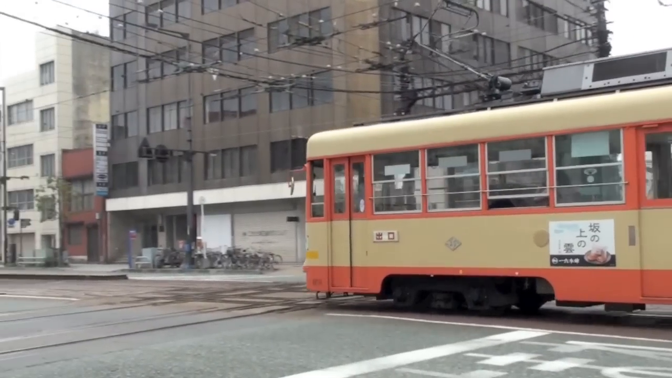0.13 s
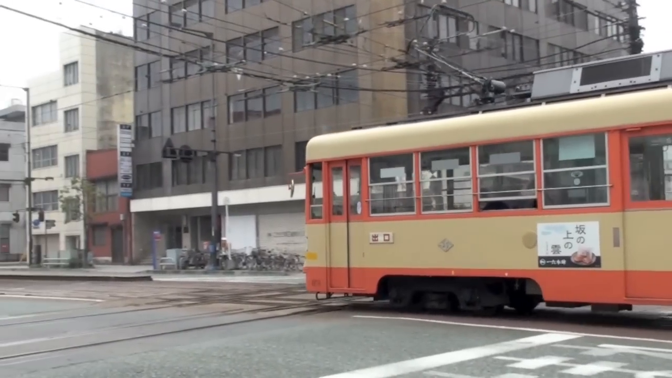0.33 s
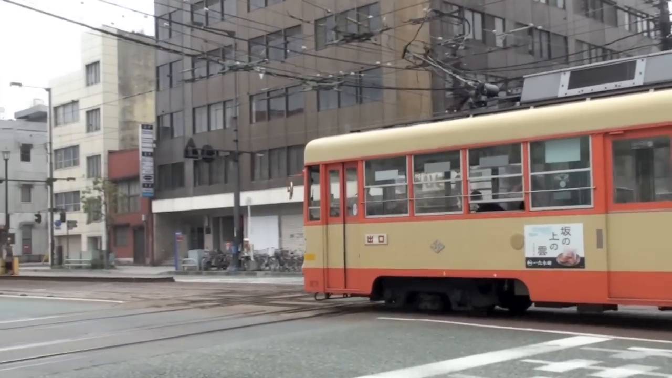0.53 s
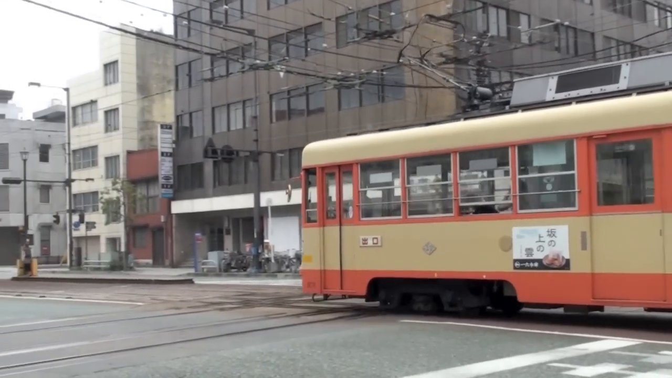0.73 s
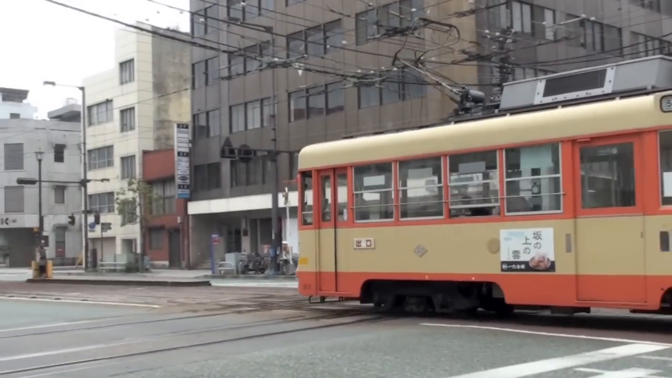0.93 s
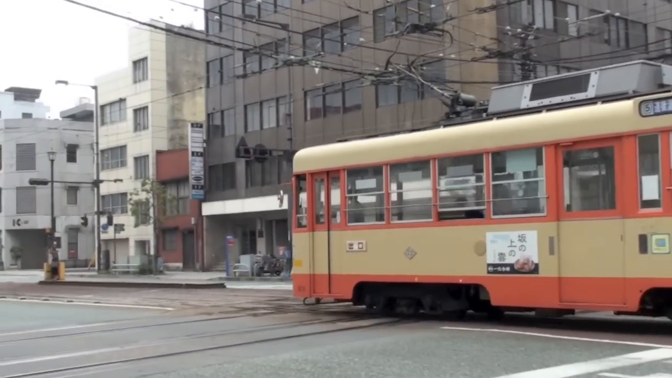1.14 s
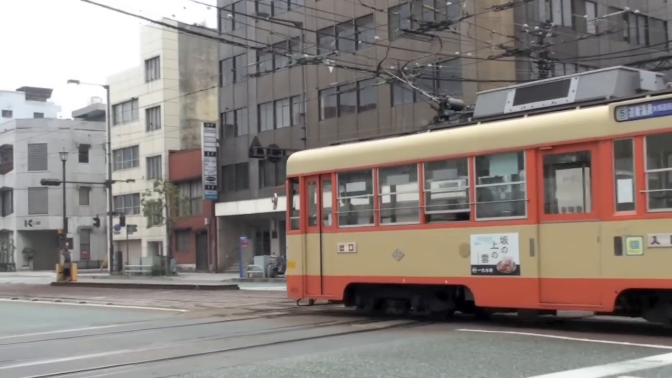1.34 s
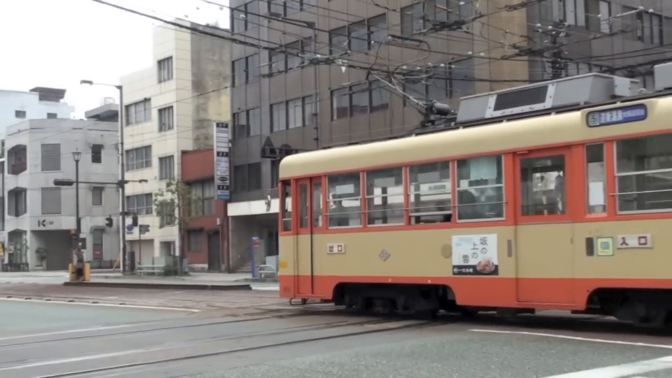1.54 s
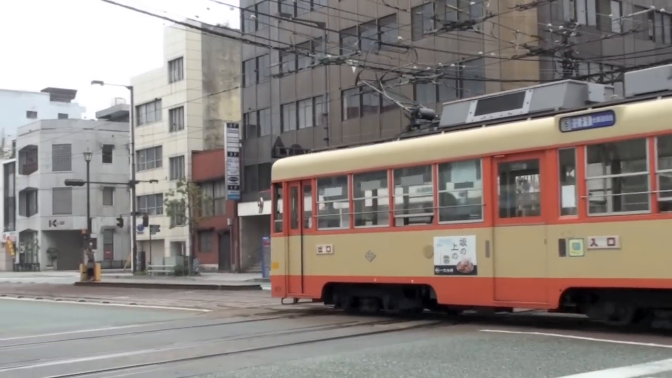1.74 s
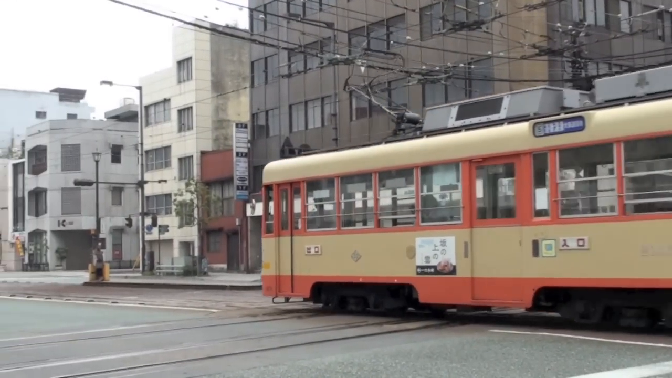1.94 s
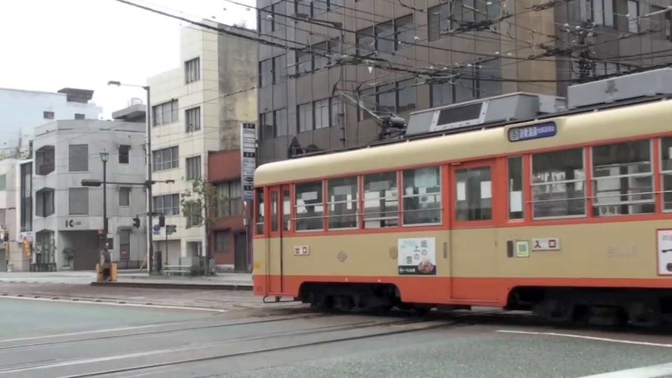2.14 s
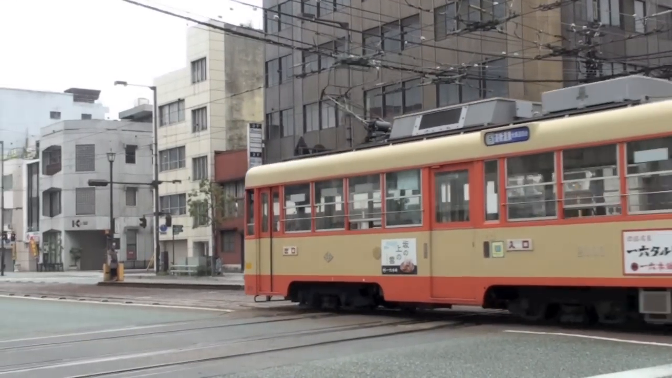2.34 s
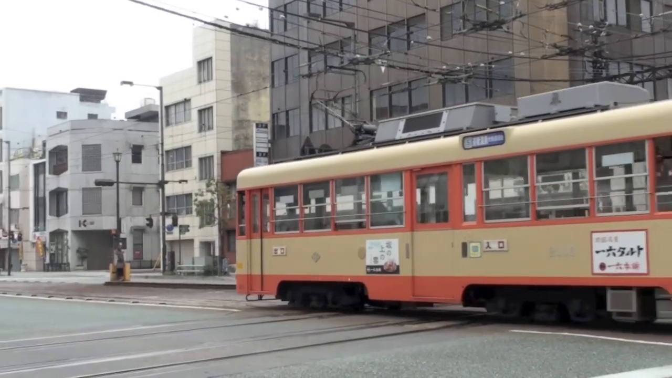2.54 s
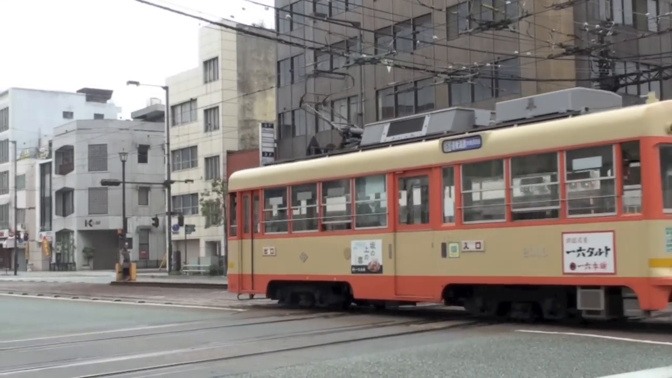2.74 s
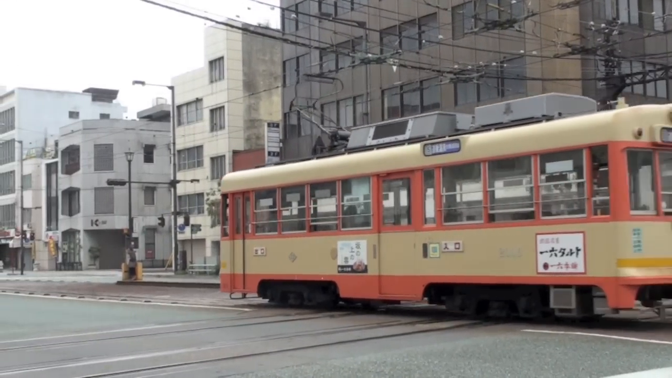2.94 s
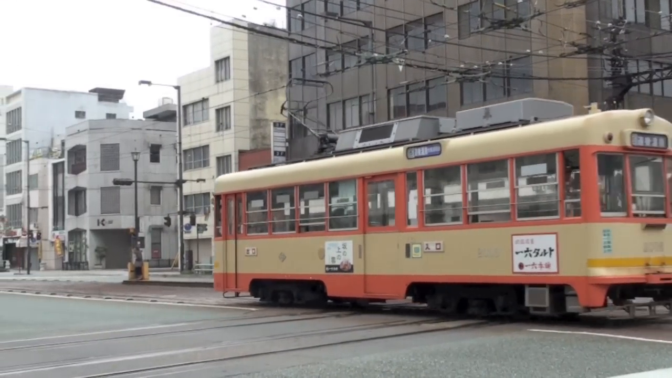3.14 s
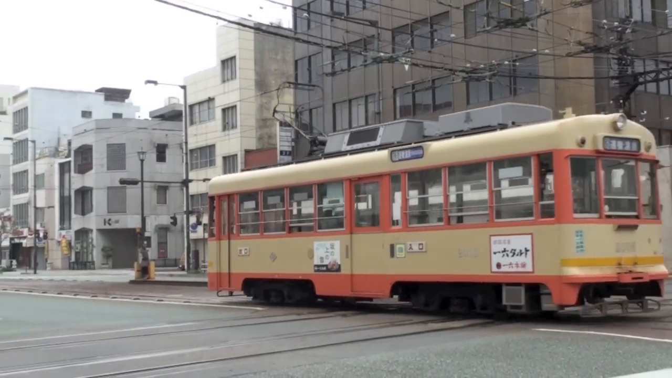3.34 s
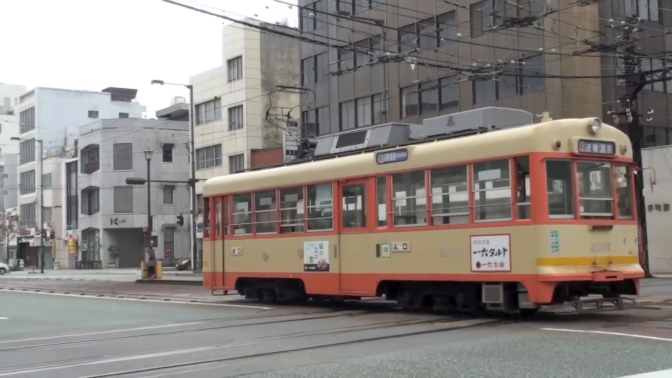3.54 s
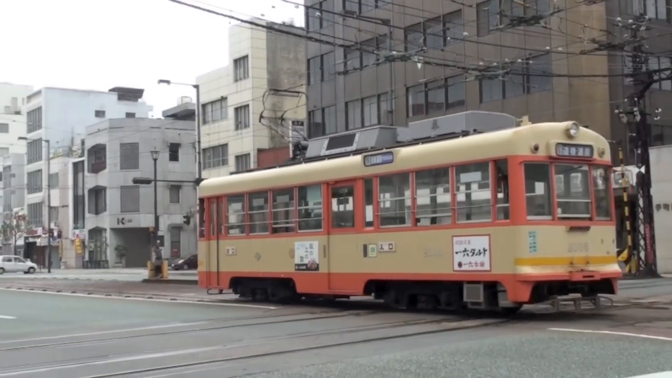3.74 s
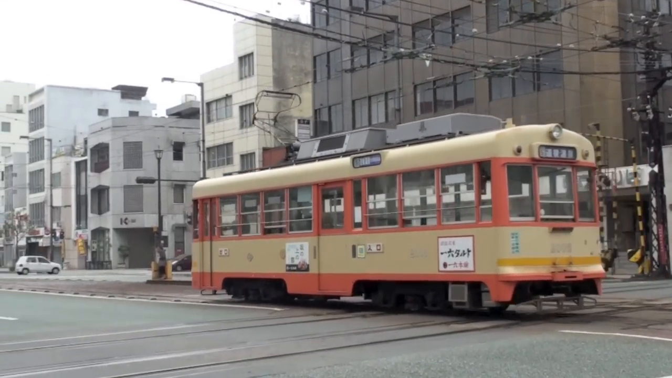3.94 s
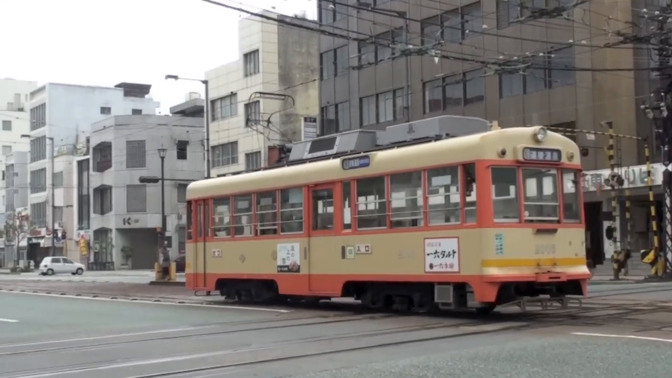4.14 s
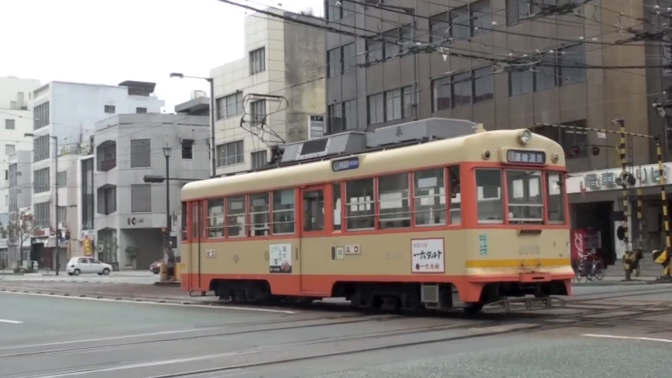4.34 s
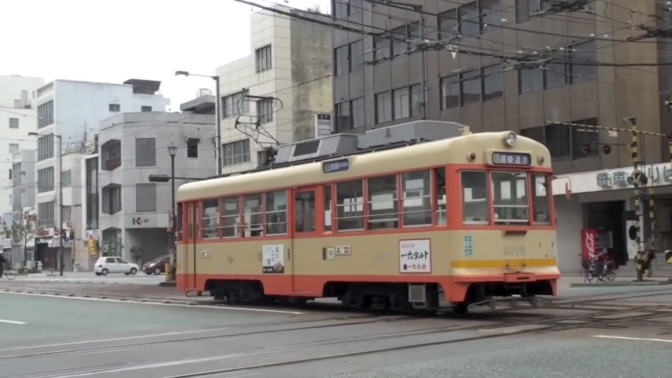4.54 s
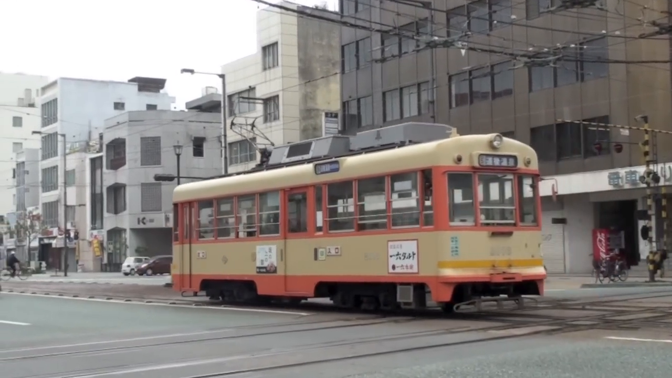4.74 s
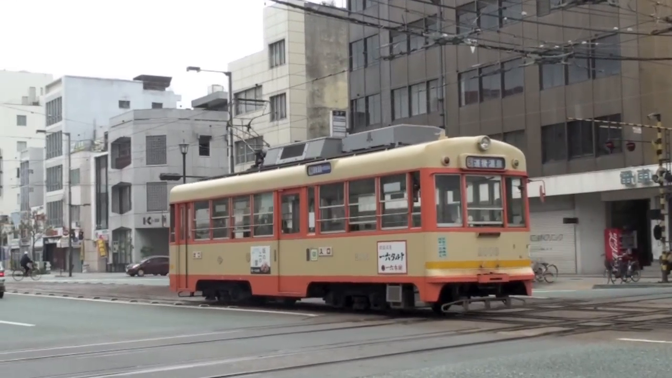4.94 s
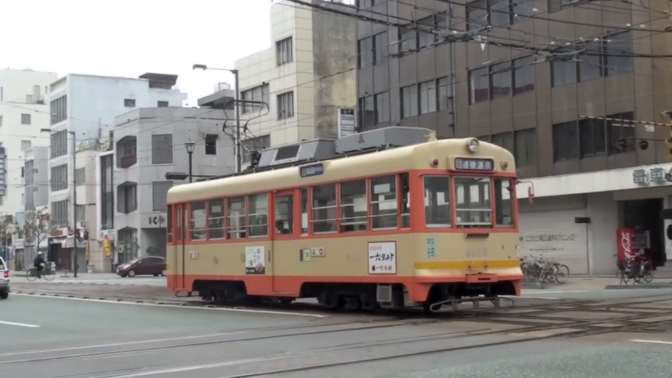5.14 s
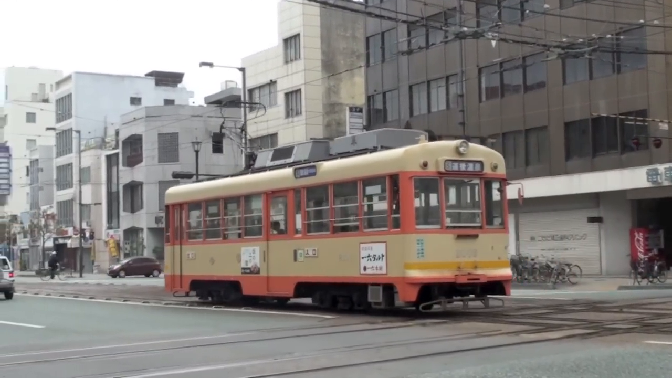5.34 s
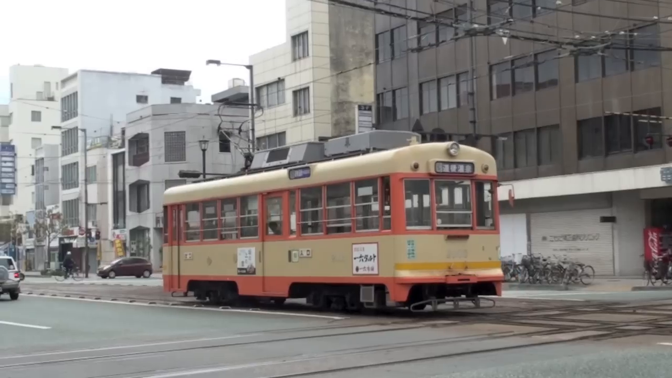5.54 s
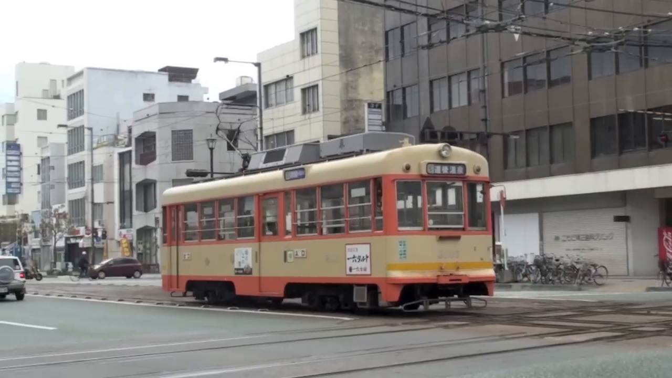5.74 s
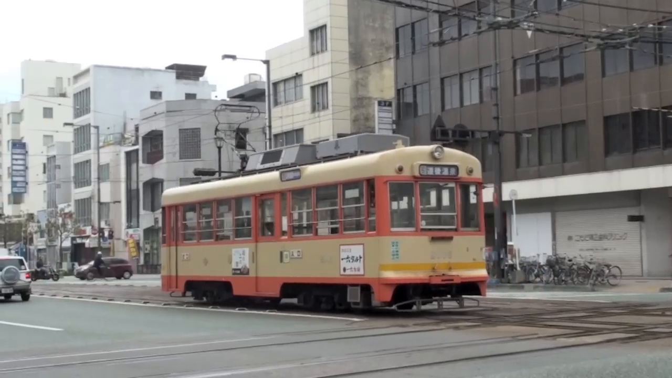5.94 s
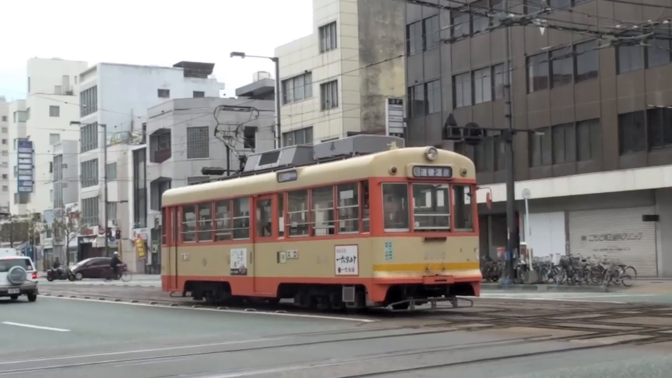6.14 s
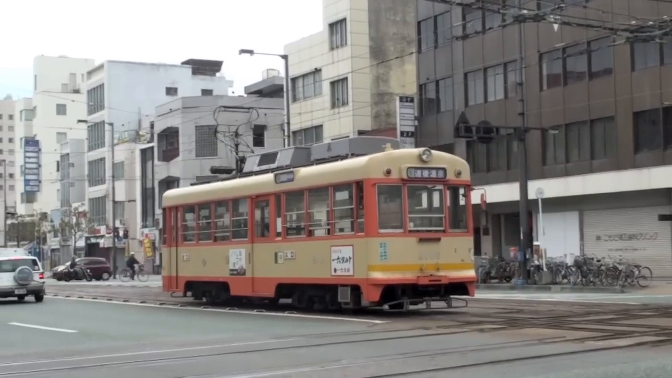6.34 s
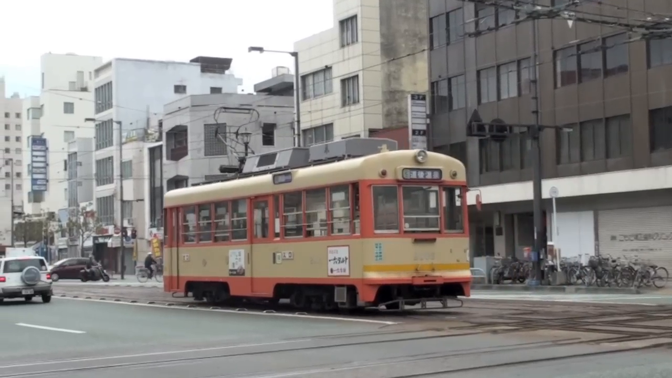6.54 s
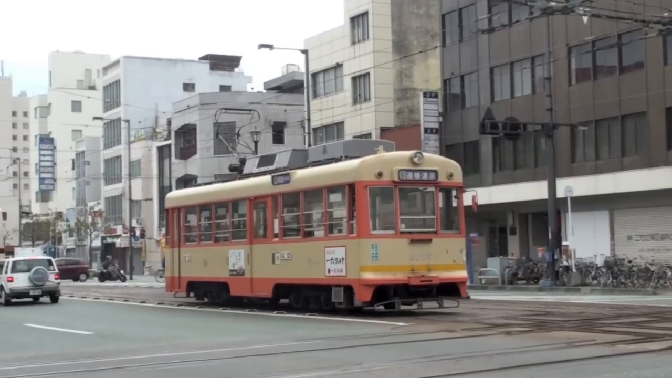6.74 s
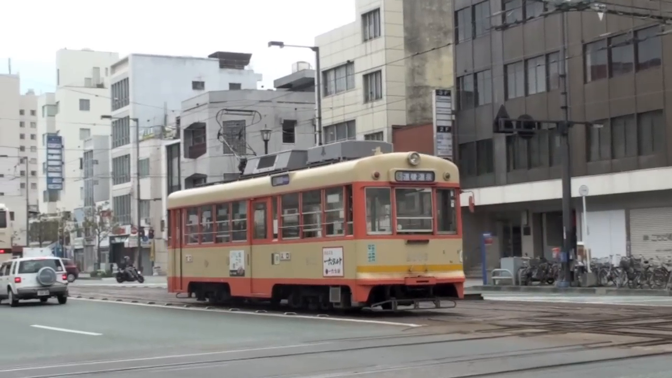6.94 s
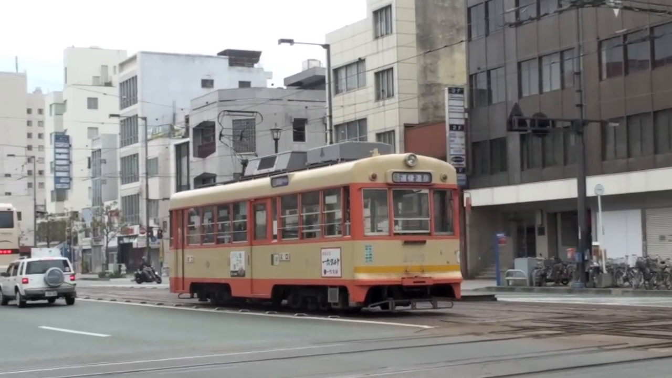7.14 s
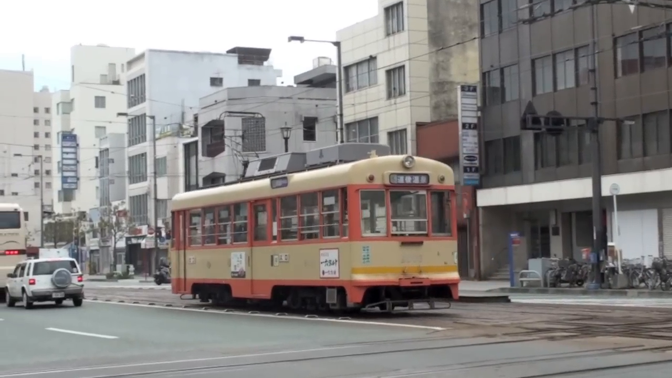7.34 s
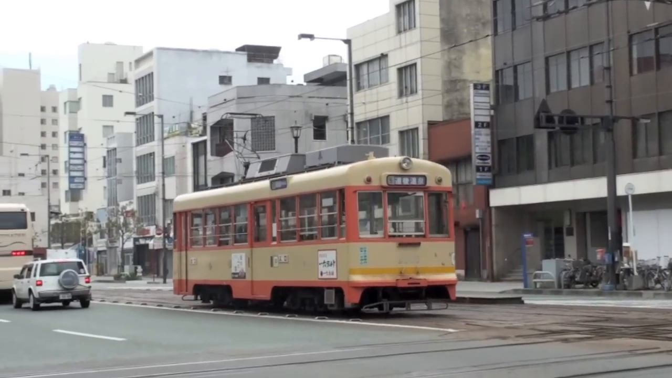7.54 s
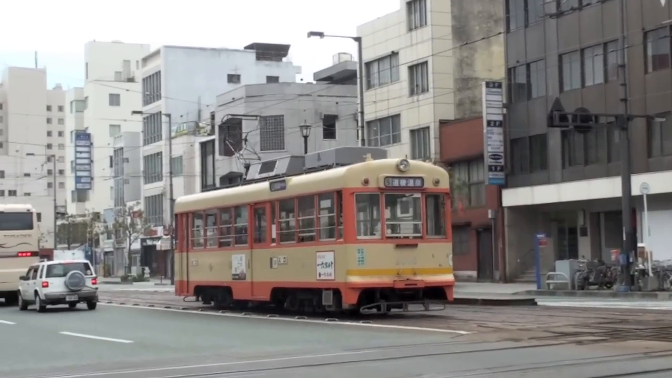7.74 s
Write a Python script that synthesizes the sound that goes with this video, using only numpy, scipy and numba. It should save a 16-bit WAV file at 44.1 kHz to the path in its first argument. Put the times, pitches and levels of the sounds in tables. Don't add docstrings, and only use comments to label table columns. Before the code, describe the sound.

Loud double metallic knocks and rattling as a tram crosses rail gaps in a city street, fading to traffic and a passing car.

```python
import sys
import numpy as np
from scipy import signal
from scipy.fft import rfft, irfft
from scipy.io import wavfile
from scipy.ndimage import uniform_filter1d
from numba import njit

SR = 44100
rng = np.random.default_rng(int(sys.argv[2]) if len(sys.argv) > 2 else 0)


def inscribe(sig):
    pcm = np.round(np.clip(np.atleast_2d(sig).T, -1, 1) * 32767)
    wavfile.write(sys.argv[1], SR, pcm.astype(np.int16))


def field_ratio(decibels):
    return 10 ** (np.asarray(decibels, dtype=float) / 20)


N = 347508
TIME = np.arange(N) / SR

# time in seconds, swell in dB, idling engine in dB.
TRAFFIC = [
    (0, 7.5, -18),
    (2, 4, -10),
    (5, -1.5, -1),
    (5.8, -0.8, -17),
    (6.9, -0.4, -6),
    (7.88, 0.2, -6),
]
# frequency in Hz, density in dB per Hz.
STREET_SPECTRUM = [(12, -36), (20, -2.5), (133, -3), (232, -2), (534, -6.5), (631, -6.5), (746, -6.5),
                   (932, -12.5), (1540, -15.5), (3000, -21), (3540, -33), (4070, -28), (8170, -40.5),
                   (15500, -48)]
# frequency in Hz, level in dB, decay t60 in seconds.
TYRE_WHINE = [
    (2280, -15, 0.017),
    (2930., -18.5, 0.025),
]
# frequency in Hz, side minus mid in dB.
STEREO_WIDTH = [(60, -12), (200, -17), (700, -13), (2400, -14), (8000, -11), (10500, -9), (11800, -17),
                (20000, -36)]
# start in seconds, peak in dB, t60 in seconds, first spark in dB.
SNAPS = [
    (0.1134, -27, 0.11, 3),
    (0.965, -22, 0.1, 1),
    (2.4219, -9.5, 0.15, 3),
    (2.4752, -14.5, 0.17, -3),
]
# frequency in Hz, density in dB per Hz.
SNAP_SPECTRUM = [(880, -41), (1500, -27), (3210, 1.5), (3990, -6), (6890, -4.5), (9060, -13),
                 (11700, -18.5), (13900, -35), (15500, -83)]
# start in seconds, build in seconds, peak in dB,
# loose steel in dB, ground in dB (both relative to the peak).
SHUDDERS = [(0.0, 0.17, -19.5, -19, -10), (0.552, 0.22, -22.5, -29, -2.5), (0.99, .14, -10.5, -11.5, -10.5),
            (1.43, 0.15, -10.5, -10.5, -19), (1.8, 0.032, -11.5, -14, -19), (2.12, 0.19, -17.5, -14.5, -10),
            (2.48, .19, -10.5, -10.5, -20), (2.89, 0.1, -8.5, -12, -21), (3.25, 0.15, -12, -11, -11.5),
            (3.7, 0.085, -18.5, -12, -21), (4.045, 0.11, -11.5, -15, -11.5), (4.4, .14, -13, -12, -18),
            (4.87, 0.12, -22, -10, -10), (5.28, 0.088, -33.5, -20, -15)]
# frequency in Hz, density in dB per Hz.
GROUND_SPECTRUM = [(12, -33), (20, -25), (49, -3), (102, -0.5), (156, -10.5), (200, -5), (260, -30.5),
                   (440, -120)]
# start in seconds, frequency in Hz, level in dB, t60 in seconds.
CLANKS = [(0.0, 491.4, -19.5, 0.91), (0.03, 293, -21, 1.2), (0.3, 567, -35, 1.8), (0.655, 3160, -24, 0.11),
          (0.66, 180, -20, .4), (0.72, 3250, -21, 0.07), (0.722, 2030, -27, 0.22), (0.743, 3250, -20, 0.12),
          (0.745, 1753, -24, .2), (0.995, 47, -14, .17), (1.36, 741, -19, 0.56), (1.53, 5050, -30, .08),
          (3.18, 750, -16, 1.6), (3.27, 5230, -27, 0.32), (3.27, 1725, -24, 0.57), (3.4, 4330, -30, 0.44),
          (3.72, 745, -12.5, 0.25), (3.797, 742, -19.5, 0.55), (3.812, 1725, -28.5, 0.71),
          (4.97, 6800, -53, .1), (5.064, 5400, -35, .1)]
# time in seconds, level in dB.
ROLLING = [(0.0, -27), (0.8, -29.5), (1.4, -28), (1.9, -37), (2.7, -29), (3.1, -29), (3.6, -31), (4.1, -39),
           (4.6, -28.5), (4.95, -36), (5.3, -44), (6.9, -42.5), (7.88, -43.5)]
# frequency in Hz, density in dB per Hz.
TREAD_SPECTRUM = [(290, -41), (500, 1.5), (748, -8), (815, -5), (1220, -34.5), (1770, -5.5), (2650, -13.5),
                  (2890, -6), (3580, -21), (3900, -16), (7340, -29), (8240, -23.5), (15500, -49)]
# frequency in Hz, level in dB.
WHEEL_HUM = [
    (738., -8.5),
    (1724., -20),
]
WHEEL_HZ = [739, 931, 1724, 2280, 2830, 2972, 3250, 3782, 4190, 4945, 5220, 5380, 5785, 6305, 6975, 7770,
            8200, 8480, 8730, 8990, 9940, 10430, 10930, 11420, 12120]
# level in dB, t60 in seconds.
WHEEL_MODES = [(-3, 0.77), (-12, 0.19), (-9, 0.57), (-11.5, 0.015), (-13.5, 0.14), (-11.5, .2),
               (-18, 0.076), (-14.5, 0.21), (-16, 0.14), (-18.5, 0.15), (-26, .12), (-17, 0.099),
               (-22, 0.19), (-30, 0.11), (-21, 0.11), (-24.5, 0.26), (-21.5, .12), (-26, 0.23), (-46, 0.26),
               (-47, .2), (-32, .15), (-32, .15), (-31.5, .15), (-29, .07), (-29, .06)]
# frequency in Hz, spread in Hz, level in dB.
PLATES = [(2990, 46, 5.5), (3740, 49, -4), (4150, 94, 1), (4840, 70, -14), (6900, 300, 3), (7770, 51, -8),
          (11400, 150, -8), (12100, 65, -11)]
# frequency in Hz, density in dB per Hz.
LOOSE_SPECTRUM = [(530, -29), (900, 0.5), (1470, -12.5), (1760, -4.5), (2380, -14), (2910, -17),
                  (3520, -18), (5200, -16), (6150, -23), (6720, -23), (11200, -34.5), (13000, -43),
                  (14200, -52)]
# frequency in Hz, density in dB per Hz.
BOGIE_SPECTRUM = [(71, -37.5), (120, -10), (166, -6.5), (203, -3.5), (263, -3.5), (418, 0), (600, -7),
                  (718, -2.5), (871, -14), (941, -13), (1160, -17.5), (1740, -21.5), (2600, -40),
                  (3380, -37), (5720, -120)]
AXLES = [(0.655, 0.733), (1.0195, 1.0966), (1.358, 1.4326), (1.8081, 1.8832), (2.1253, 2.203),
         (2.4723, 2.5499), (2.8993, 2.9788), (3.2524, 3.335), (3.7205, 3.7977), (4.0484, 4.1401),
         (4.4061, 4.4901), (4.5349, 4.6035), (4.8826, 4.9646), (5.2874, 5.3719)]
# first contact in dB, second contact in dB, bright share in dB,
# # rattle t60 in seconds.
BLOWS = [(-17, -13.5, -16, .26), (-5, -6.5, -27, .17), (-7.5, -6, -18.5, 0.33), (-3.5, -4.5, -15, 0.22),
         (-9, -8.5, -17.5, 0.19), (-2.5, -5, -39.5, 0.086), (-4.5, -7, -27, .3), (-4, -6.5, -25, 0.25),
         (-5, -4, -34.5, 0.13), (-4.5, -8, -24, 0.22), (-3, -3.5, -37, 0.37), (-4, -5, -22, .09),
         (-5.5, -5.5, -39, 0.18), (-25, -23.5, -21, 0.17)]
# start in seconds, peak in dB, bright share in dB.
BOUNCES = [(0.98, -11.5, -32), (1.15, -11.5, -12), (1.209, -7.5, -35), (1.469, -5, -20), (1.538, -12, -7),
           (1.598, -7.5, -14.5), (1.919, -6.5, -15.5), (2.308, -11, -26), (2.6, -7, -21),
           (2.661, -2.5, -19.5), (2.72, -10, -24), (3.04, -1.5, -23), (3.389, -24, -35), (3.443, -10, -8.5),
           (3.676, -12, -36), (3.74, -21, -31), (3.948, -24, -23), (4.1, -7, -39), (4.219, -6.5, -20),
           (4.438, -8, -33), (4.984, -21, -13), (5.019, -34, -26), (5.062, -14, -16), (5.432, -34.5, -39)]


def unit(x):
    return x / np.sqrt(np.mean(x ** 2))


def curves(table):
    s, *columns = np.transpose(table)
    return [np.interp(TIME, s, c) for c in columns]


def noise():
    return rng.standard_normal(N)


def colour(x, table):
    hz, db = np.transpose(table)
    log_hz = np.log(np.maximum(np.fft.rfftfreq(4096, 1 / SR), 1))
    cepstrum = irfft(np.interp(log_hz, np.log(hz), db) * np.log(10) / 20)
    cepstrum[1:2048] *= 2
    cepstrum[2049:] = 0
    h = irfft(np.exp(rfft(cepstrum)))
    return signal.oaconvolve(x, h / np.sqrt(np.sum(h ** 2)))[:N]


def walk(rate):
    hold = int(SR / rate)
    steps = np.repeat(rng.standard_normal(N // hold + 1), hold)
    return 1.3 * uniform_filter1d(uniform_filter1d(steps, hold), hold)[:N]


def knocks(per_s, spread_db):
    hits = rng.random(N) < per_s / SR
    return unit(hits * rng.standard_normal(N) * field_ratio(spread_db * rng.exponential(size=N)))


def pan(x, db):
    return x * field_ratio(np.array([db / 2, -db / 2]).reshape(2, -1))


def wide(mid, side):
    width = field_ratio(np.interp(np.arange(100, SR / 2, 50), *np.transpose(STEREO_WIDTH)))
    side = colour(side, STEREO_WIDTH) * np.sqrt(np.mean(width ** 2))
    return np.array([mid + side, mid - side])


@njit
def resonate(contacts, sway, force, strikes, shift, kick, pole, gain):
    out = np.zeros((2, len(force)))
    for m in range(len(pole)):
        z = 0j
        for i in range(len(force)):
            j = i - shift[m]
            z = z * pole[m] + contacts[j] * sway[j] * force[i] + kick[j] * strikes[i] + 1e-18
            out[0, i] += gain[0, m] * z.imag
            out[1, i] += gain[1, m] * z.imag
    return out


def modes(contacts, sway_db, force, hz, db, t60, pan_db, strikes=np.zeros(N), kick_db=0.):
    kick = field_ratio(kick_db) * rng.standard_normal(N)
    fade = np.exp(-np.log(1000) / (t60 * SR))
    gain = pan(2 * np.sqrt(1 - fade) * field_ratio(db), pan_db * rng.standard_normal(len(hz)))
    shift = rng.integers(0, N, len(hz))
    pole = fade * np.exp(2j * np.pi * hz / SR)
    return resonate(contacts, field_ratio(sway_db), force, strikes, shift, kick, pole, gain)


def traffic():
    swell_db, engine_db = curves(TRAFFIC)
    roar = wide(colour(noise(), STREET_SPECTRUM), colour(noise(), STREET_SPECTRUM))
    idle = modes(noise(), 1.8 * walk(3.), field_ratio(engine_db), hz=np.array([98.]), db=0., t60=.25, pan_db=.4)
    arrives_s, fade_in_s = 5.7, 0.22
    car = np.clip((TIME - arrives_s) / fade_in_s + 1, .3, 1)
    tyres = modes(noise(), 1.0 * walk(3.94), car, *np.transpose(TYRE_WHINE), pan_db=.4)
    street_db = -34 - 2.0 + 1.0 * walk(1.46)
    return pan(1.0, .9) * (roar + idle + tyres) * field_ratio(swell_db + street_db)


@njit
def walls(x, lags, gain, damp):
    line, soft, out = np.zeros((8, 8192)), np.zeros(8), np.zeros((2, len(x)))
    for i in range(len(x)):
        total = 0.
        for k in range(8):
            soft[k] += (1 - damp) * (gain[k] * line[k, (i - lags[k]) & 8191] - soft[k])
            total += soft[k]
            out[k % 2, i] += soft[k] * (1 - 2 * (k // 2 % 2))
        for k in range(8):
            line[k, i & 8191] = x[i] + soft[k] - total / 4
    return out


def house_fronts(direct):
    t60_s, damp, level_db = 0.79, 0.66, -13.5
    lags = rng.integers(900, 4000, 8)
    return field_ratio(level_db) * walls(direct.mean(axis=0), lags, field_ratio(-60 * lags / SR / t60_s), damp)


def snaps():
    spark_t60_s = 0.013
    force = np.zeros(N)
    for s, db, t60, spark_db in SNAPS:
        age = np.maximum(TIME - s, 0)
        sizzle = field_ratio(db - 60 * age / t60)
        spark = field_ratio(db + spark_db - 60 * age / spark_t60_s)
        force += (sizzle + spark) * (TIME >= s)
    return colour(knocks(16000.0, 1.1) * force, SNAP_SPECTRUM) * field_ratio(-11.0)


def shudder(peaks_db, build_db, sag_db_per_s):
    attack_s = 0.018
    power = 0
    for (s, build_s, *_), db in zip(SHUDDERS, peaks_db):
        age = np.maximum(TIME - s, 0)
        shape_db = np.minimum(build_db * (age / build_s - 1), sag_db_per_s * (build_s - age))
        onset = 1 - np.exp(-age / attack_s) if s > 0 else 1
        power = power + (field_ratio(db + shape_db) * onset) ** 2
    return np.sqrt(power)


def ground_thud(force):
    mid, side = [colour(noise() * force, GROUND_SPECTRUM) for _ in range(2)]
    return pan(mid + field_ratio(-5.) * np.outer([1, -1], side), 1.8)


def clanks():
    out = 0
    flutter = field_ratio(2.1 * walk(40.))
    waver = np.cumsum(.008 * walk(150.)) / SR
    for s, hz, db, t60 in CLANKS:
        age = np.maximum(TIME - s, 0)
        cycles = hz * (age + hz / 3000 * (waver - waver[int(s * SR)]))
        rise = 1 - np.exp(-age / 0.004)
        out = out + field_ratio(db - 60 * age / t60) * rise * np.sin(2 * np.pi * cycles)
    return out * flutter


def hum(force):
    out = 0
    for hz, db in WHEEL_HUM:
        level = field_ratio(db + 1.4 * walk(7.))
        cycles = np.cumsum(hz * (1 + .003 * walk(12.))) / SR
        out = out + level * np.sin(2 * np.pi * cycles)
    return force * out


def treads(rolling):
    grind = wide(colour(noise(), TREAD_SPECTRUM), colour(noise(), TREAD_SPECTRUM))
    return grind * rolling * field_ratio(-2.5)


def wheels(blow, rolling):
    hz = np.array(WHEEL_HZ, float)
    db, t60 = np.transpose(WHEEL_MODES)
    contacts, sway_db = noise(), 2.1 * walk(8.)
    struck_db = db - 1.2 * np.log2(hz / 740)
    struck = sum(modes(contacts, sway_db, blow, hz * tune, struck_db, t60, pan_db=1.8) for tune in (.9985, 1.002))
    return struck + modes(contacts, sway_db, rolling, hz, db, t60, pan_db=1.6)


def loose_steel(force):
    hz, spread_hz, db = np.repeat(PLATES, 2, axis=0).T
    hz = hz + spread_hz * rng.standard_normal(len(hz))
    pings = modes(knocks(40., 2.8), 2.9 * walk(6.3), force, hz, db - 22.5, t60=0.055, pan_db=1.5)
    mid, side = [colour(knocks(9000., 1.4) * force, LOOSE_SPECTRUM) for _ in range(2)]
    return wide(mid, side) + pings


def crack(strikes):
    push = np.roll(np.convolve(strikes, np.hanning(64), "same"), -40)
    rebound = signal.butter(2, 170., "high", fs=SR, output="sos")
    return -1.55 * signal.sosfilt(rebound, push)


def bogie_bang(strikes, force):
    contact_side = field_ratio(-2.5) * np.outer([1, -1], knocks(3000., 2.1))
    bare = field_ratio(-8.5) * (knocks(3000., 1.9) + contact_side) * force
    hz = 150. * 2 ** (np.arange(30) / 8.6 + 0.022 * rng.standard_normal(30))
    db = 1.44 + 10 * np.log10(hz / SR)
    t60 = 0.098 * (400 / hz) ** 0.76
    frame = modes(knocks(1500., 2.28), 1.86 * walk(12.), force, hz, db, t60, 4.3, strikes, kick_db=16.6)
    body = np.array([colour(c, BOGIE_SPECTRUM) for c in bare + frame]) * field_ratio(-11.5)
    return pan(body + crack(strikes), 1.8)


def blows():
    strikes, bogie, loose, wheel, ground = np.zeros((5, N))
    age = np.arange(SR // 2) / SR
    drops = []
    for wheel_s, (first_db, second_db, bright_db, rattle_s) in zip(AXLES, BLOWS):
        drops.append((wheel_s[0], first_db, bright_db, rattle_s))
        drops.append((wheel_s[1], second_db, bright_db, rattle_s))
    bounces = [(*row, 0.23) for row in BOUNCES]
    for table, lag, crack_db, ring_db in ((drops, .001, 1.5, -0.8), (bounces, .004, -8., 0)):
        for s, db, bright_db, t60 in table:
            i = int((s + lag) * SR)
            span = slice(i, i + len(age))
            fade = field_ratio(db - 60 * age / max(t60, .03))
            strikes[i] = field_ratio(db + crack_db)
            bogie[span] += fade ** 2
            loose[span] += (fade * field_ratio(bright_db)) ** 2 * (1 - np.exp(-age / 0.01))
            wheel[span] += (fade * field_ratio(ring_db)) ** 2 * np.exp(-age / 0.089)
            ground[span] += (fade * field_ratio(-20 - .45 * db)) ** 2
    return strikes, *np.sqrt([bogie, loose, wheel, ground])


def scene():
    strikes, bogie, loose, wheel, thud = blows()
    _, _, shake_db, loose_db, thud_db = np.transpose(SHUDDERS)
    roll_db, = curves(ROLLING)
    rolling = field_ratio(roll_db + 1.23 * walk(9.))

    frame_force = np.hypot(field_ratio(-7.0) * bogie, shudder(shake_db, build_db=3.3, sag_db_per_s=44.3))
    loose_shake = shudder(shake_db + loose_db - 1.5, build_db=7.9, sag_db_per_s=58)
    loose_force = np.hypot(field_ratio(3.0) * loose, loose_shake)
    hum_force = np.hypot(rolling, shudder(shake_db - 12, build_db=2.5, sag_db_per_s=23))
    ground_shake = shudder(shake_db + thud_db - 3., build_db=0.5, sag_db_per_s=21)
    ground_force = np.hypot(field_ratio(-5.) * thud, ground_shake)

    tram = bogie_bang(strikes, frame_force) + loose_steel(loose_force)
    tram = tram + wheels(field_ratio(-21.0) * wheel, rolling * field_ratio(-7)) + hum(hum_force) + treads(rolling)
    direct = tram + ground_thud(ground_force) + snaps() + clanks()
    return direct + house_fronts(direct) + traffic()


def roll_off(x):
    return signal.sosfilt(signal.butter(12, 15660, fs=SR, output="sos"), x)


def record(dry):
    rounded = 1.1 * np.tanh(dry / 1.1)
    return roll_off(rounded)


dry = scene()
out = record(dry)
inscribe(out)
```